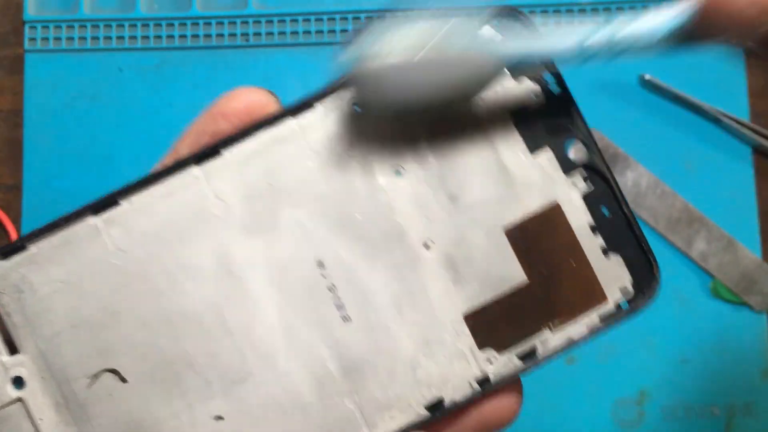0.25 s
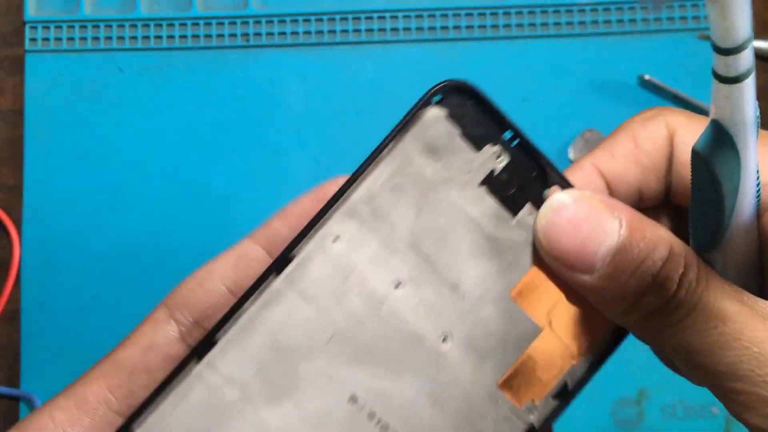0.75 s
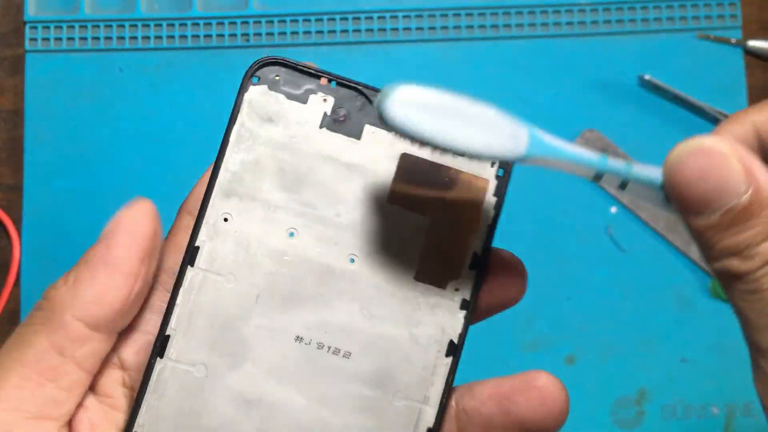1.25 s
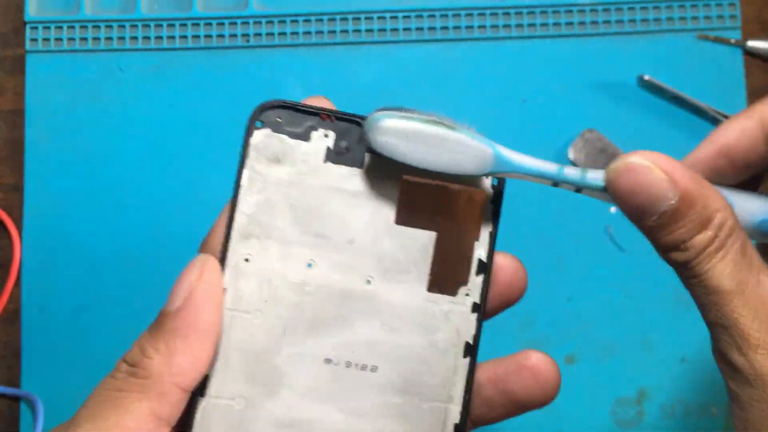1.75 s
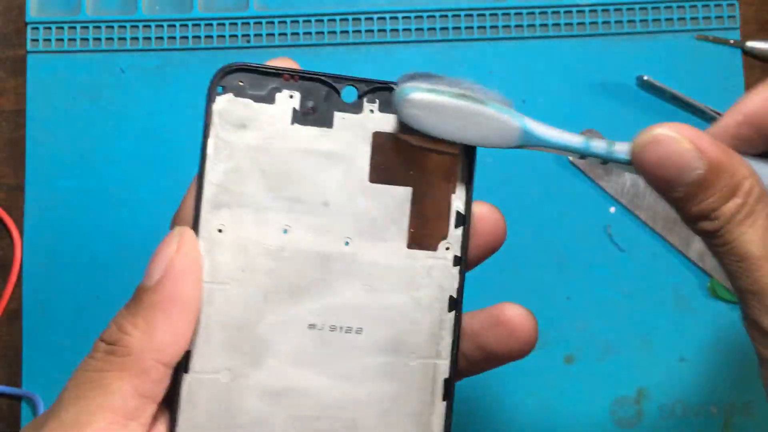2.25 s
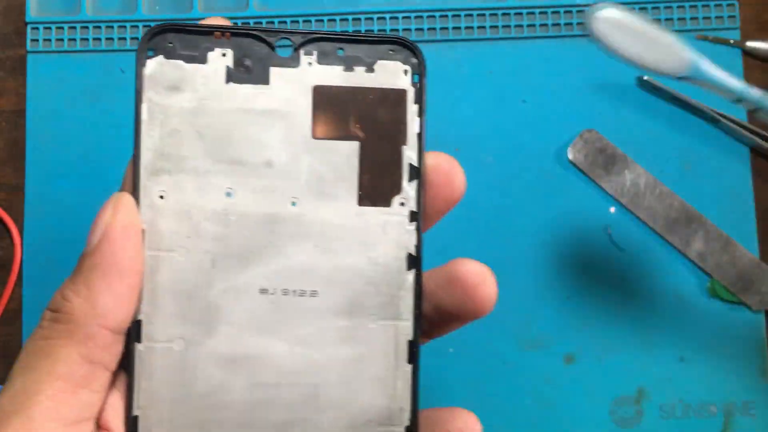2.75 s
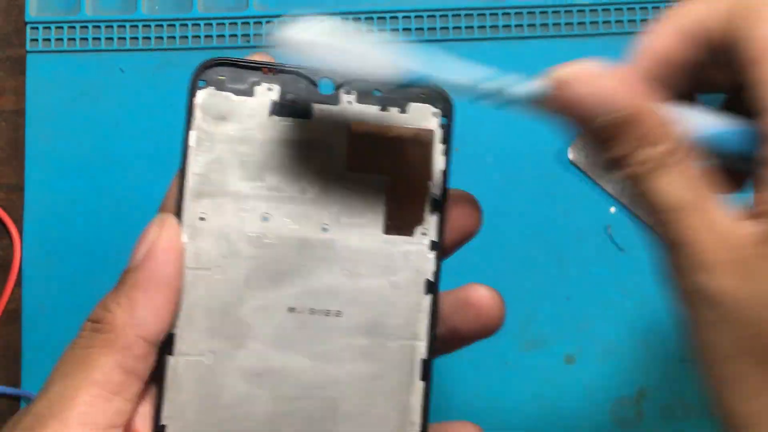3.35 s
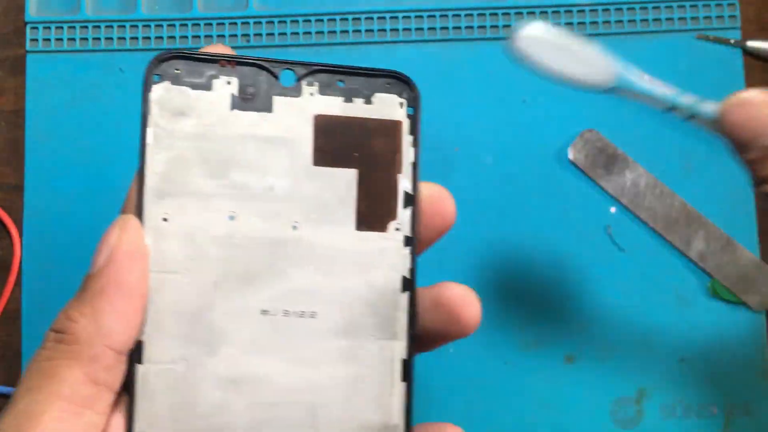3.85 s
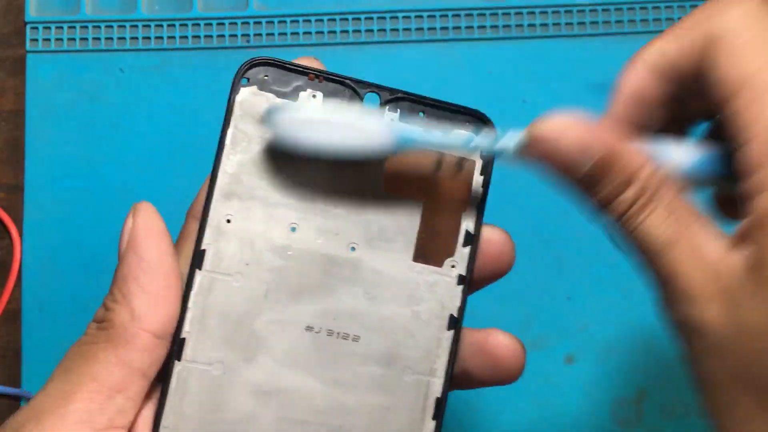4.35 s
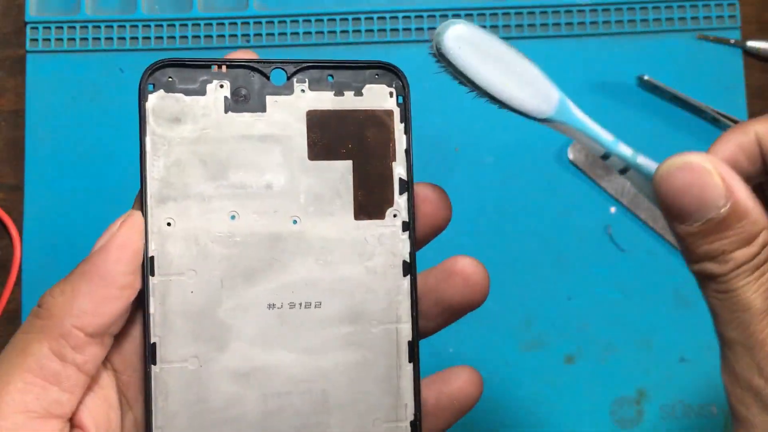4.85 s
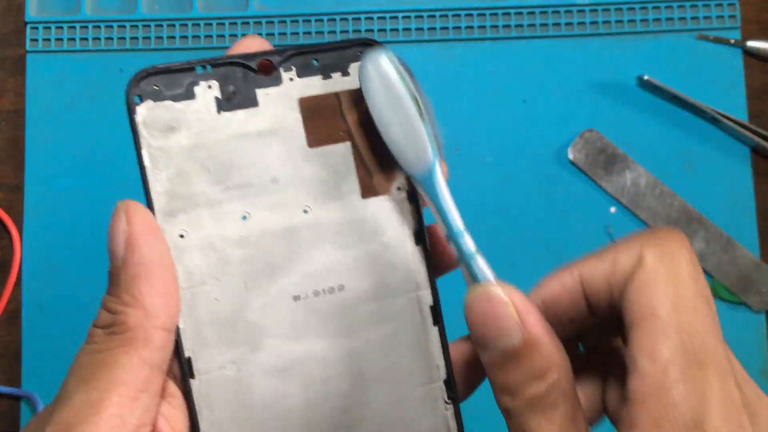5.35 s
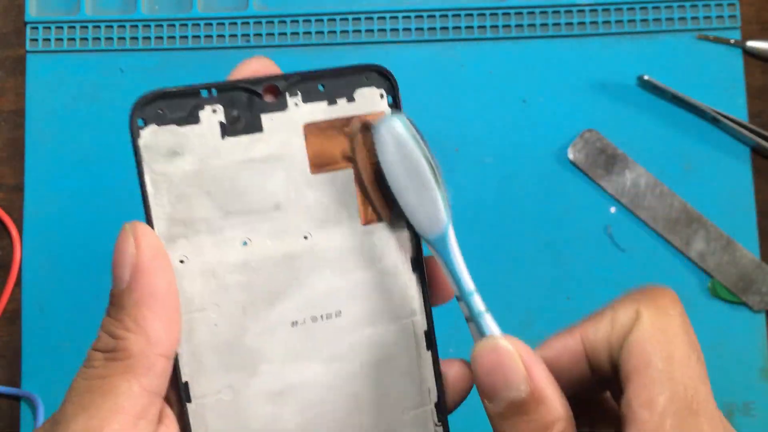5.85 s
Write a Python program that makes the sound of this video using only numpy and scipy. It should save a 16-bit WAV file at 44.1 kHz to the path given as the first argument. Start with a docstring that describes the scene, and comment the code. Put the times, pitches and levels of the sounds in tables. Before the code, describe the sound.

In a small room, close to the microphone, a toothbrush scrubs a hand-held metal phone frame. Quick hissy strokes and a flick come first, then faint taps, a steady run of back-and-forth scrubbing, separate flicks snapping off the rim, and finally lighter side strokes. Low rumble swells with the hand movements, over a wavering hum, faint hiss and growing distant traffic.

```python
"""At a workbench in a small room, close to the microphone, a toothbrush scrubs a hand-held metal phone frame.
A few quick strokes and a flick come first, then light hits and rubs, more back-and-forth strokes, a run of
single flicks off the rim, and last lighter strokes along the side. Slipping bristles are bursts of clicks that
hiss, snap and ring the frame's modes. Under it filtered noise makes the room's rumble, a faint hiss and distant
traffic that slowly grows; a wavering hum and a far engine are sums of sines that swell and fade."""
import sys
import numpy as np
from scipy import signal
from scipy.fft import rfft, irfft
from scipy.io import wavfile
from scipy.ndimage import uniform_filter1d

SR = 44100
rng = np.random.default_rng(int(sys.argv[2]) if len(sys.argv) > 2 else 0)


def to_wav(s):
    """Save 16-bit WAV."""
    ch = np.atleast_2d(s).T  # columns
    pcm = np.round(np.clip(ch, -1, 1) * 32767)  # PCM
    wavfile.write(sys.argv[1], SR, pcm.astype(np.int16))


N = 269010
TIME = np.arange(N) / SR


def amp(db):
    """Decibels to gain."""
    return 10 ** (np.asarray(db) / 20)


def unit(x):
    """Scales to an rms of one."""
    return x / np.sqrt(np.mean(x ** 2) + 1e-20)


def at_hz(points, hz):
    """Reads a spectrum on a log-frequency axis."""
    f, value = np.transpose(points)
    return np.interp(np.log(hz + 1), np.log(f + 1), value)


def curve(rows, axis=1):
    """Reads one column of a time curve at every sample."""
    columns = np.transpose(rows)
    return np.interp(TIME, columns[0], columns[axis])


def colour(x, points):
    """Filters by a spectrum; white noise keeps its power."""
    hz = np.fft.rfftfreq(2 * N, 1 / SR)
    gain = unit(amp(at_hz(points, hz)))
    return irfft(rfft(x, 2 * N) * gain)[:N]


def noise(points):
    """Noise of rms one with the given spectrum."""
    return unit(colour(rng.standard_normal(N), points))


def wander(hz):
    """Slow chance of rms one, up to about this rate."""
    lowpass = np.exp(-(np.fft.rfftfreq(N, 1 / SR) / hz) ** 2)
    return unit(irfft(rfft(rng.standard_normal(N)) * lowpass, N))


def shifting(x, patchy_db):
    """Lets the colour shift in random patches of time and frequency; the result has rms one."""
    z = signal.stft(x, nperseg=512)[2]
    patches = uniform_filter1d(rng.standard_normal(z.shape), size=7, axis=0)  # across frequency
    patches = uniform_filter1d(patches, size=12, axis=1)  # across time
    return unit(signal.istft(z * amp(patchy_db * unit(patches)), nperseg=512)[1][:N])


def passing(rows):
    """Gain of sounds that swell and fade as if passing by: power falls with the square of the distance."""
    power = sum(amp(db) ** 2 / (1 + ((TIME - s) / half_s) ** 2) for s, half_s, db in rows)
    return np.sqrt(power)


def burst(s, decay_s):
    """Envelope of a short contact softened by the tips: a quick ramp times a decay."""
    cushion_s = 0.00095
    return np.clip((TIME - s) / cushion_s, 0, 1) * np.exp(-np.clip(TIME - s, 0, 1) / decay_s)


# Back-and-forth strokes, from one turn of the hand to the next.
# Each row: start in seconds, length in seconds, bristle level in dB.
STROKES = [(-.05, .12, -40.5), (0.059, 0.15, -39), (.2, 0.087, -40), (1.527, .175, -36.5),
           (1.691, 0.14, -34), (1.816, 0.14, -36.5), (1.949, 0.14, -34.5), (2.077, .12, -37.5),
           (2.193, 0.14, -32.5), (2.32, 0.13, -36.5), (2.451, 0.12, -32), (2.562, 0.13, -36),
           (5.122, 0.14, -43.5), (5.364, 0.18, -47.5), (5.477, 0.15, -43), (5.628, 0.14, -35),
           (5.764, 0.12, -40), (5.896, 0.12, -38.5), (6.035, 0.073, -38.5)]
# Where the brush works, from the flat plate to the top rim and then the side.
# Each row: time in seconds, push on the frame in dB relative to the bristles, ring of that spot in Hz.
SPOT = [(.15, -19, 1570), (1.7, -10.5, 1567), (2.6, -12.5, 1460), (5.2, -7, 1510), (5.62, -33, 1380),
        (5.73, -1.5, 1410), (5.84, -4.5, 1150), (6.03, -6, 1330)]
HISS_POWER, PUSH_POWER = 1.32, 0.73  # hiss and push grow as these powers of the hand's speed


def strokes():
    """The hand speeds up, then slows to rest at each turn; hiss and push follow its speed."""
    spot_push, spot_hz = amp(curve(SPOT)), curve(SPOT, axis=2)
    events = []
    for start, length, db in STROKES:
        speed = np.sin(np.pi * np.clip((TIME - start) / length, 0, 1))
        slide = amp(db) * speed ** HISS_POWER
        push = amp(db) * spot_push * speed ** PUSH_POWER
        events.append((slide, push, spot_hz))
    return events


# The bristle tips land on the frame or catch on it. Each row: time in seconds, bristle level in dB.
LANDINGS = [(.092, -38), (0.223, -40.5), (0.32, -39), (1.501, -47), (1.558, -40), (2.349, -37.5),
            (3.157, -40), (3.476, -31.5), (3.777, -33), (4.09, -35.5), (4.433, -30), (5.117, -45),
            (5.976, -34)]
LANDING_DECAY_S, LANDING_PUSH_DB, LANDING_RING_HZ = 0.009, -3, 1485  # push relative to the tap
DRAG_DB, DRAG_S = -13, 0.092  # light drag: dB relative to the landing, decay time in s


def landings():
    """The tips tap the frame, then drag lightly."""
    events = []
    for s, db in LANDINGS:
        tap = amp(db) * burst(s, LANDING_DECAY_S)
        drag = amp(db + DRAG_DB) * burst(s, DRAG_S)
        events.append((tap + drag, amp(LANDING_PUSH_DB) * tap, LANDING_RING_HZ))
    return events


# Flicks off the rim.
# Each row: release in seconds, length up to the release in seconds, bristle level in dB, ring in Hz.
FLICKS = [(0.376, 0.1, -34.5, 2010), (2.78, 0.12, -31.5, 1420), (3.273, 0.13, -32, 1440),
          (3.587, 0.14, -31, 1440), (3.899, 0.13, -30, 1450), (4.189, 0.096, -31, 1410),
          (4.63, 0.11, -30, 1580)]
FLICK_RISE_SHARE = 0.53  # share of a flick until full contact
FLICK_PUSH_DB, RELEASE_S = -3, 0.0043  # push at release relative to the bristles; dying away in s


def flicks():
    """More and more tufts touch and bend, then all spring free of the rim."""
    events = []
    for s, length, db, hz in FLICKS:
        bend = np.clip((TIME - s + length) / length, 0, 1)
        release = np.exp(-np.clip(TIME - s, 0, 1) / RELEASE_S)
        touching = np.minimum(bend / FLICK_RISE_SHARE, 1) ** 3.64 * release
        events.append((amp(db) * touching, amp(db + FLICK_PUSH_DB) * touching * bend, hz))
    return events


# Short hits, snaps and rubs on the frame, some of them within a flick.
# Each row: time in seconds, push on the frame in dB, ring in Hz.
SHORT_CONTACTS = [(.36, -28, 1580), (0.647, -43, 1330), (.712, -41.5, 2080), (.763, -40, 3280),
                  (.771, -33, 3300), (1.023, -43.5, 1400), (1.046, -43.5, 1400), (2.044, -33, 940),
                  (2.772, -23.5, 1380), (4.139, -27, 1440), (4.593, -23, 1910), (5.191, -37, 1510),
                  (5.205, -25, 1490)]
SHORT_DECAY_S, SHORT_HISS_DB = .005, -3  # hiss relative to the push


def short_contacts():
    """Short hits, snaps and rubs: each is a quick burst that rings the frame and stirs the bristles."""
    events = []
    for s, db, hz in SHORT_CONTACTS:
        push = amp(db) * burst(s, SHORT_DECAY_S)
        events.append((amp(SHORT_HISS_DB) * push, push, hz))
    return events


def contact():
    """At every sample: how hard the bristles are excited, how hard they shake the frame, and its ring pitch."""
    events = strokes() + landings() + flicks() + short_contacts()
    slide_power = sum(slide ** 2 for slide, push, hz in events)
    push_power = sum(push ** 2 for slide, push, hz in events)
    # the strongest contact weighs most in the pitch
    ring_hz = sum(push ** 2 * hz for slide, push, hz in events) / (push_power + 1e-20)
    return np.sqrt(slide_power), np.sqrt(push_power), ring_hz


def slips(per_s, clump_db, tuft_hz):
    """Tiny clicks of single bristles letting go, bunched where a whole tuft slips."""
    clicks = rng.standard_normal(N) * (rng.random(N) < per_s / SR)
    return unit(clicks * amp(clump_db * wander(tuft_hz)))


def resonate(x, hz, width):
    """A steep resonance that follows the curve hz; white noise keeps its power."""
    turn = np.exp(2j * np.pi * np.cumsum(hz) / SR)
    r = np.exp(-np.pi * width / SR)
    # shift the resonance down to zero, smooth twice, shift back up
    low = signal.lfilter([(1 - r) ** 2], [1, -2 * r, r * r], x / turn + 1e-18)
    return (turn * low).real * np.sqrt(2 * 2 * 2 / (1 - r))


# Modes of the frame, damped by the hand; the second is the main ring.
# Each row: frequency in Hz before the shift, width of each smoothing in Hz, relative level in dB.
FRAME = [(800, 760, -11), (1520, 295, 0), (1640, 430, -7), (2350, 390, -15), (3130, 1500, -26),
         (3470, 640, -37)]


def ring(push, ring_hz):
    """Slips rattle the frame's modes, which shift together with the spot that is touched and with the grip."""
    shift = ring_hz / FRAME[1][0] * (1 + 0.04 * wander(39))
    total = 0
    for hz, width, db in FRAME:
        rattle = push * slips(per_s=5000, clump_db=2.5, tuft_hz=150)
        total = total + amp(db) * resonate(rattle, hz * shift, width)
    return total


# Hiss of slipping bristles. Each row: frequency in Hz, relative level in dB per Hz.
BRISTLE = [(300, -32), (900, -19), (2600, -5.5), (3900, -9), (4900, -5.5), (5400, -1), (7000, -0.5),
           (8000, -0.5), (8800, 1.5), (9700, 3.5), (10400, -2), (11500, 3.5), (14000, 0), (15700, 1)]
# Snap of a bristle on the rim. Each row: frequency in Hz, relative level in dB per Hz.
SNAP = [(700, -47), (1200, -2), (2000, 0.5), (3200, -1.5), (4500, -3.5), (6000, -6.5), (15000, -21)]


def brush(slide, push, ring_hz):
    """Bristle slips are heard directly as hiss and snaps, and through the ringing frame."""
    hiss_slips = shifting(slips(per_s=26000, clump_db=1.2, tuft_hz=222), patchy_db=2.5)
    hiss = colour(slide * hiss_slips, BRISTLE)
    # stiff, high-pitched spots of the frame ring less and snap more
    stiff = np.clip((ring_hz - 1560) / 400, 0, 1)
    # under a hard push single bristles snap over the rim
    snap_slips = shifting(slips(per_s=2600, clump_db=3.3, tuft_hz=202), patchy_db=5.0)
    snaps = colour(push * amp(8.6 * stiff) * snap_slips, SNAP)
    ringing = ring(push * amp(-8 * stiff), ring_hz)
    return hiss + amp(-9) * snaps + amp(-2.5) * ringing


# How long the small room rings. Each row: frequency in Hz, time to fall by 60 dB in seconds.
ROOM_T60 = [(300, 0.37), (1500, 0.072), (6000, 0.18), (15000, 0.2)]


def room(x, wet_db):
    """A weak tail from the walls: sparse taps, each band dying at its own speed."""
    count = SR // 2
    taps = rng.standard_normal(count) * (rng.random(count) < 3000 / SR)
    taps = taps * (TIME[:count] > .004)  # the first 4 ms stay empty
    hz, t, z = signal.stft(taps, SR, nperseg=256)
    decay = np.exp(-np.log(1000) * t / at_hz(ROOM_T60, hz)[:, None])
    tail = signal.istft(z * decay, SR, nperseg=256)[1]
    return x + amp(wet_db) * signal.oaconvolve(x, tail / np.linalg.norm(tail))[:N]


# Standing waves of the room.
# Each row: frequency in Hz, width in Hz from the centre to 1/e of the lift, lift in dB.
ROOM_MODES = [(104.1, 12.4, 5), (152.4, 22.4, 10.5), (206, 11.7, 10), (247, 6.2, -4), (259.4, 6.8, 8),
              (318.1, 3.1, 11.5), (323, 27, 4), (405, 4.1, 14.5)]


def in_room(points):
    """Noise of rms one with the given spectrum, lifted at the room's standing waves."""
    f = np.fft.rfftfreq(N, 1 / SR)
    lift_db = sum(db * np.exp(-((f - hz) / width) ** 2) for hz, width, db in ROOM_MODES)
    return unit(irfft(rfft(noise(points)) * amp(lift_db), N))


# Wavering tones that swell and fade.
# Each row: mean frequency in Hz, time when loudest in seconds, half-power time in seconds, amplitude in dB
# before wandering.
HUM = [(150.6, 3.57, 2, -35.5), (316.8, .7, 0.39, -52), (319.4, 4.13, 0.53, -44)]


def hum(waver):
    """Sines whose pitch and level wander slowly."""
    total = 0
    for hz, *swell in HUM:
        gain = passing([swell]) * amp(2.03 * wander(3.6))
        turns = hz * np.cumsum(1 + waver * wander(9.1)) / SR
        total = total + gain * np.sin(2 * np.pi * turns)
    return total


# Steady rumble of the room. Each row: frequency in Hz, relative level in dB per Hz.
RUMBLE = [(20, -48), (38, -51), (48, -15.5), (66, 0), (85, 1.5), (108, -3.5), (124, -15.5), (170, -10.5),
          (230, -27), (330, -28), (480, -44), (900, -89)]
# Level of the rumble without the hands. Each row: time in seconds, level in dB.
RUMBLE_DB = [(0, -35.5), (.7, -33.5), (1.8, -31.5), (3.0, -34), (4.1, -33), (4.8, -27), (5.3, -31),
             (5.95, -30.5), (6.1, -26)]
HANDLING_DB, HANDLING_S = 0.5, 0.071  # hands' rumble relative to the bristle level; averaging time in s


def rumble(slide, waver):
    """Low noise of the room, swelling with each move of the hands, with a wavering hum in it."""
    low = in_room(RUMBLE)
    steady = low / np.sqrt(uniform_filter1d(low ** 2, size=4000))  # evens out the level
    handling = amp(HANDLING_DB) * uniform_filter1d(slide, size=max(round(HANDLING_S * SR), 1))
    return np.hypot(amp(curve(RUMBLE_DB)), handling) * steady + hum(waver)


# Wash of distant traffic. Each row: frequency in Hz, relative level in dB per Hz.
TRAFFIC = [(100, 7), (400, 3.5), (560, 3.5), (800, 0.5), (1200, 2), (1800, -2.5), (3000, -10.5),
           (4500, -19.5), (9000, -53)]
# Level of the traffic's wash. Each row: time in seconds, level in dB.
TRAFFIC_DB = [(0, -58), (2.2, -59.5), (2.8, -51), (4.4, -49), (5.7, -44), (6.1, -45)]
# Low drone of distant traffic. Each row: frequency in Hz, relative level in dB per Hz.
DRONE = [(40, -45), (130, -6.5), (230, 7.5), (340, -5.5), (430, -9.5), (600, -23.5), (1000, -58)]
# The drone swells as vehicles pass.
# Each row: time when nearest in seconds, half-power time in seconds, level in dB.
DRONE_PASSES = [(2.2, 0.26, -46), (4.15, 0.27, -40), (5.15, 0.41, -38.5)]
# Tones of a far engine. Each row: multiple of the turning rate, relative level in dB before wandering.
ENGINE_ORDERS = [(10, 3), (11, -2.5), (12, -10), (13, 1.5), (14, 5.5), (15, 1), (16, -4), (17, -5),
                 (20, -10.5)]
# The engine drones past twice.
# Each row: time when nearest in seconds, half-power time in seconds, level in dB.
ENGINE_PASSES = [(2.85, 0.16, -44), (5.1, 0.96, -48)]
ENGINE_HZ = 24.24  # mean turning rate


def street(waver):
    """Far traffic drones and washes as filtered noise, with one wavering engine of harmonic sines in it."""
    turns = np.cumsum(ENGINE_HZ * (1 + waver * wander(5.1))) / SR
    tones = 0
    for multiple, db in ENGINE_ORDERS:
        level = amp(db + 1.8 * wander(2.3))
        tones = tones + level * np.sin(2 * np.pi * (multiple * turns + rng.random()))
    engine = passing(ENGINE_PASSES) * unit(tones)
    drone = passing(DRONE_PASSES) * in_room(DRONE)
    wash = amp(curve(TRAFFIC_DB)) * noise(TRAFFIC)
    return engine + drone + wash


# Faint hiss behind everything. Each row: frequency in Hz, relative level in dB per Hz.
AIR = [(500, 9), (2500, 3.5), (4000, -2), (5000, -5), (6200, -1), (7500, -6.5), (9200, -4.5), (10400, -8),
       (12200, -4), (15800, -12.5)]
# Level of the faint hiss. Each row: time in seconds, level in dB.
AIR_DB = [(0, -55.5), (.9, -53), (1.3, -55.5), (2.7, -58), (3.1, -50.5), (3.5, -54.5), (5.1, -53),
          (6.1, -47.5)]


def faint_hiss():
    """Filtered noise whose colour shifts in patches and whose level drifts."""
    return amp(curve(AIR_DB)) * shifting(noise(AIR), patchy_db=2.5)


def scene():
    """The brush close by, over the rumble, the street and a faint hiss."""
    slide, push, ring_hz = contact()
    scrubbing = room(brush(slide, push, ring_hz), wet_db=-16.5)
    # waver: rms pitch wander as a fraction of the pitch
    background = rumble(slide, waver=0.01197) + street(waver=0.0038) + faint_hiss()
    return (scrubbing + background)[None]


def record(dry):
    """The recorder's band limit: a steep low-pass at 15780 Hz."""
    lowpass = signal.firwin(601, 15780, window=("kaiser", 8), fs=SR)
    return signal.oaconvolve(dry, lowpass[None], "same")


dry = scene()
out = record(dry)
to_wav(out)
```